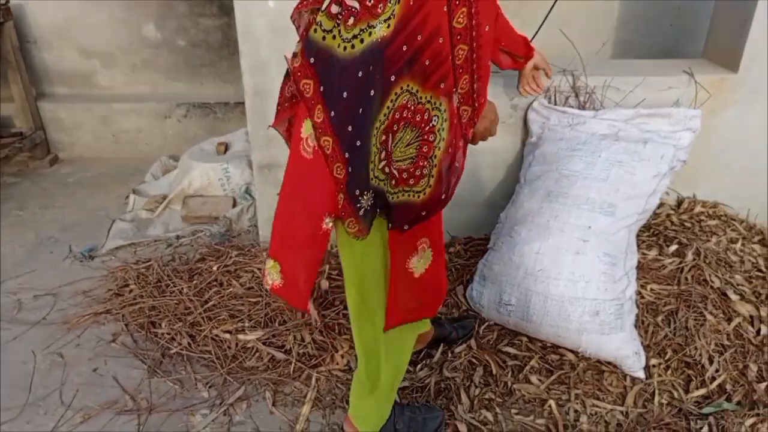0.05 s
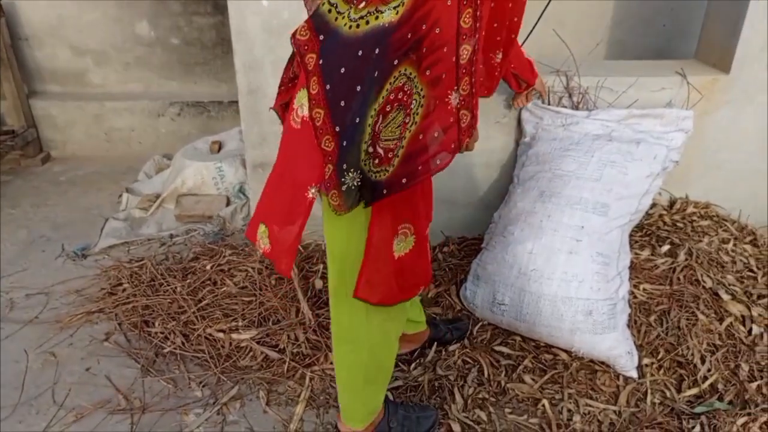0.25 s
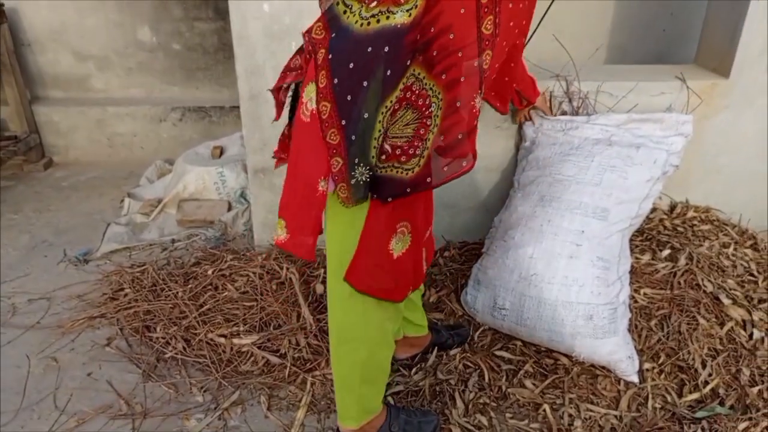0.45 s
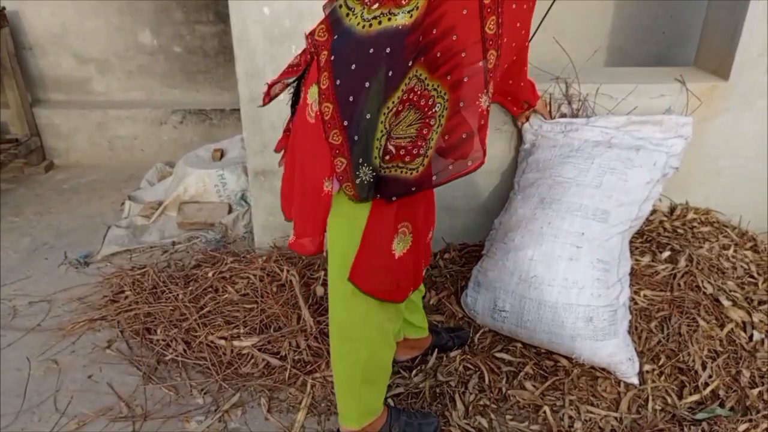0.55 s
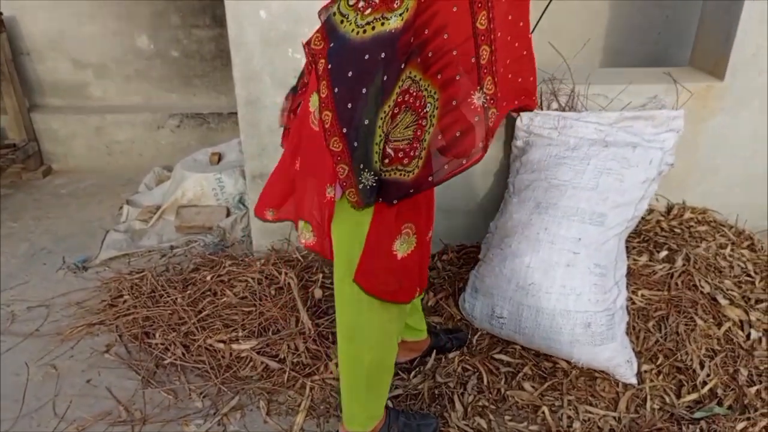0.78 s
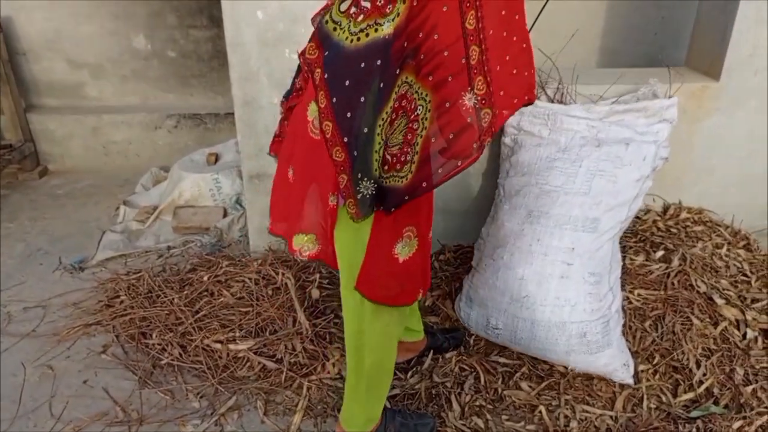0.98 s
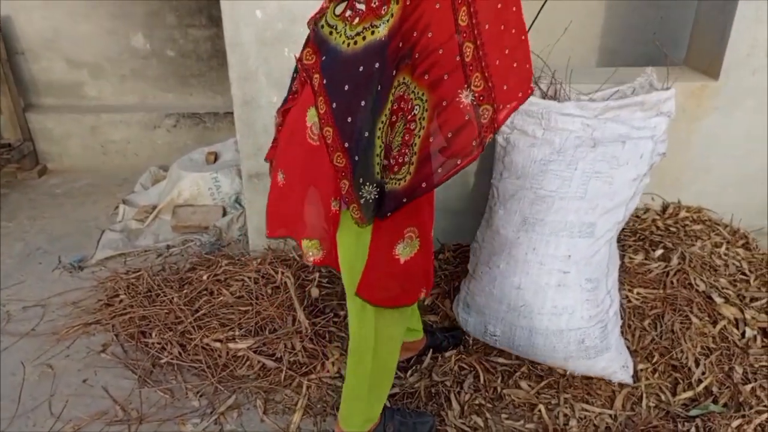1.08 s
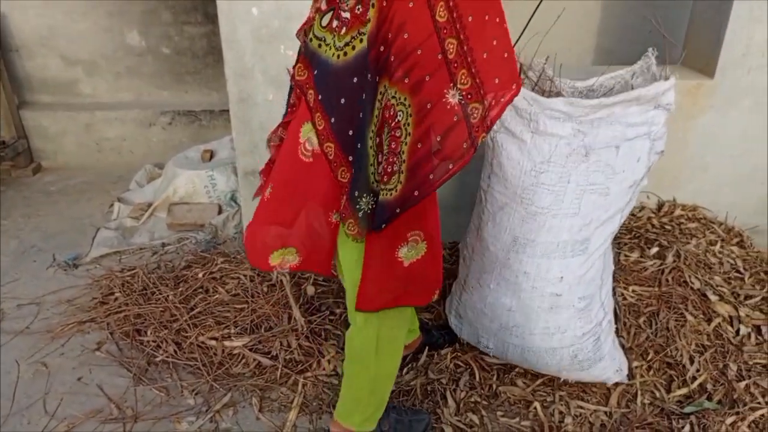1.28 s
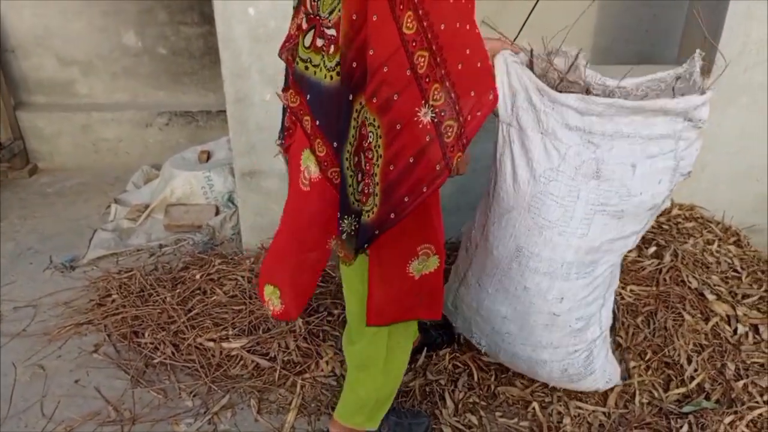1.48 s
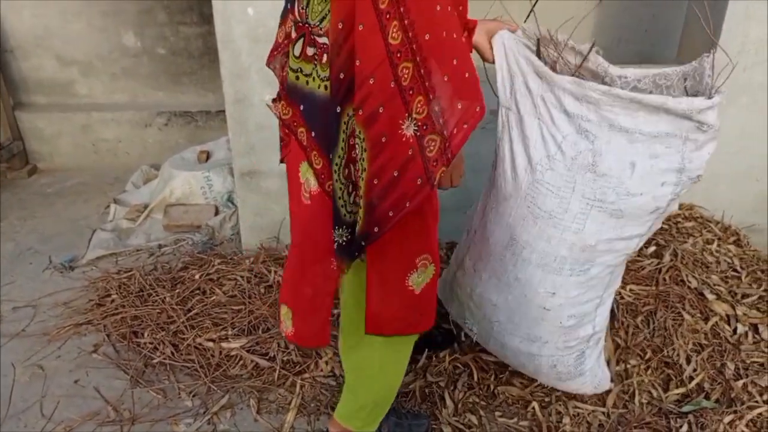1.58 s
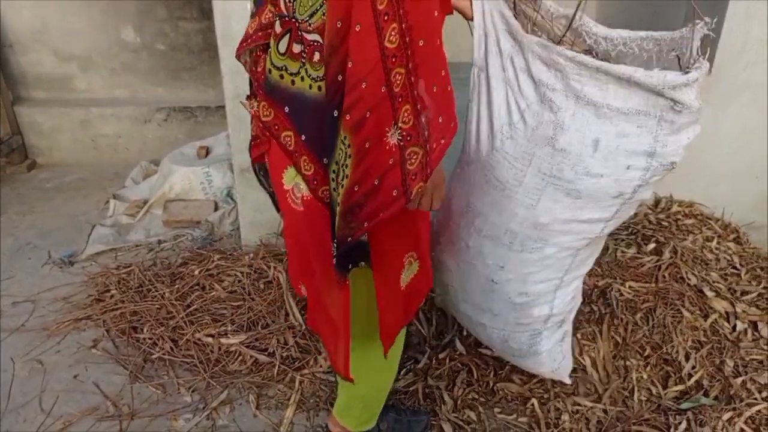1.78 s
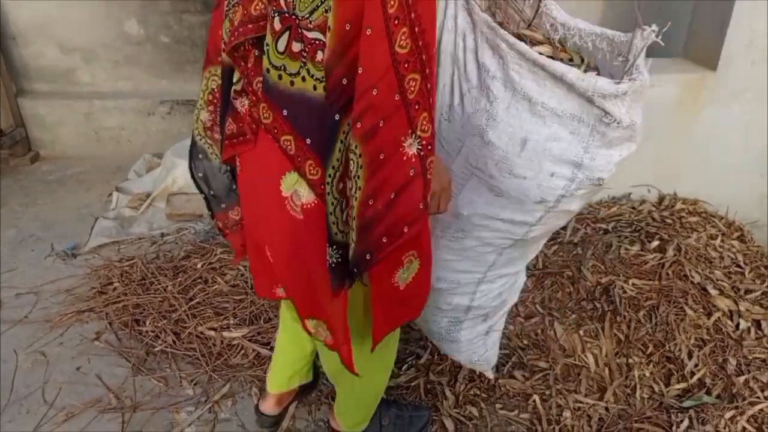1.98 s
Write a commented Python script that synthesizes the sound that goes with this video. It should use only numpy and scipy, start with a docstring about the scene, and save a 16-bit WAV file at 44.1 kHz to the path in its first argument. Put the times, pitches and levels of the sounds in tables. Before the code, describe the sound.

A sack full of dry stalks scrapes and rustles as it is pulled up in a quiet yard. Before it, twigs crackle and gusts thump on the microphone; afterwards come a sharp snap and two faint bird chirps.

```python
"""Dragging a sack of dry stalks

A woven plastic sack is gripped, dragged and lifted beside a wall, outdoors. Twigs crackle under a
shifting foot, the weave rasps, the load shuffles with a hollow rustle and a stalk snaps.
Puffs of air buffet the microphone in the first second; a small bird chirps twice among far-off tones."""
import sys
import numpy as np
from scipy import signal
from scipy.fft import rfft, irfft
from scipy.io import wavfile
from scipy.ndimage import uniform_filter1d

SR = 44100
rng = np.random.default_rng(int(sys.argv[2]) if len(sys.argv) > 2 else 0)


def master_out(mix):
    """Clip the mix to full scale and print it as 16-bit PCM to the path in sys.argv[1]."""
    frames = np.transpose(np.atleast_2d(mix))
    ceiling = np.clip(frames, -1, 1)
    pcm = np.round(ceiling * 32767).astype(np.int16)
    wavfile.write(sys.argv[1], SR, pcm)


N = 90404
T = np.arange(N) / SR
CATCH_RATE, SPURT_RATE = 200, 45  # fast and slow jumps in loudness, per second
SPURT_DB = 2.2  # typical size of a jump
# The tone of breaking wood: frequency_hz, level_db
TWIG_COLOUR = [(1190, -53), (1440, -18.5), (2700, 4), (4670, -4.5), (5660, -11), (6400, -10.5), (8190, -24),
               (11500, -12), (13400, -17.5), (15000, -10), (15800, -33.5)]


def amp(db):
    """Turn decibels into a gain."""
    return 10 ** (np.asarray(db) / 20)


def unit(x):
    """Scale a sound to an average (rms) level of 1."""
    return x / np.sqrt(np.mean(x ** 2) + 1e-20)


def steady(x, size=2200):
    """Even out the loudness but keep the fine grain."""
    power = uniform_filter1d(uniform_filter1d(x ** 2, size), size)
    return x / np.sqrt(power + 1e-12)


def curve(rows, column=1):
    """Join points of time and level into a smoothly changing gain."""
    rows = np.array(rows)
    return amp(np.interp(T, rows[:, 0], rows[:, column]))


def colour(x, points, size=8192):
    """Shape the bass and treble of a sound along points of frequency and level."""
    hz, db = np.array(points).T
    gain = amp(np.interp(np.log(np.fft.rfftfreq(size, 1 / SR) + 1), np.log(hz), db))
    # Build the filter so that it never sounds ahead of its input.
    cepstrum = irfft(np.log(gain))
    cepstrum[1:size // 2] *= 2
    cepstrum[size // 2 + 1:] = 0
    response = irfft(np.exp(rfft(cepstrum)))
    return signal.fftconvolve(x, response)[:len(x)]


def ring(x, hz, width_hz):
    """Let a sound ring at one pitch; a narrower width rings longer."""
    return signal.lfilter(*signal.iirpeak(hz, hz / width_hz, fs=SR), x)


def modes(x, table):
    """Bring out several pitches of a sound at once."""
    return sum(amp(db) * ring(x, hz, width_hz) for hz, width_hz, db in table)


def clicks(rate, spread_db):
    """Tiny random breaks and slips, about rate a second: many weak, a few strong."""
    happens = rng.random(N) < rate / SR
    size = np.minimum(rng.exponential(size=N), 5)
    sign = rng.choice([-1, 1], N)
    return happens * sign * amp(spread_db * size)


def catches(depth_db, rate):
    """A gain that jumps at random, rate times a second, as when things catch and let go."""
    hold = max(int(SR / rate), 2)
    steps = rng.standard_normal(N)[np.arange(N) // hold]
    return amp(depth_db * uniform_filter1d(steps, hold // 2))


def burst(start, decay_s):
    """A sudden spray of tiny slips that dies away."""
    return (T >= start) * np.exp(-np.abs(T - start) / decay_s) * rng.standard_normal(N)


def swell(start, length):
    """A rounded rise and fall."""
    return np.sqrt(np.abs(np.sin(np.pi * np.clip((T - start) / length, 0, 1))))


def rough_tones(table, arch, width_hz=85):
    """Rough, broken tones; the pitch rises and falls with each swell by the fraction arch."""
    out = 0
    for start, length, hz, db in table:
        tone = ring(ring(rng.standard_normal(N), hz, width_hz), hz, width_hz)
        tone = steady(tone) * catches(SPURT_DB, SPURT_RATE)
        strength = swell(start, length)
        bend = np.cumsum(hz * arch * (strength ** 2 - .5)) / SR
        bent_tone = np.real(signal.hilbert(tone) * np.exp(2j * np.pi * bend))
        out = out + amp(db) * strength * bent_tone
    return out


def yard():
    """Quiet outdoor hiss, a small bird's wavering chirps and faint far-off tones."""
    # The tone of the hiss: frequency_hz, level_db
    hiss_colour = [(400, -3), (900, -11), (2500, -4.5), (3200, -18), (3800, -4.5), (7500, -13),
                   (15000, -5.5)]
    # Bird chirps: start_s, length_s, first_hz, middle_hz, last_hz, level_db
    chirps = [(1.785, .055, 4750, 4080, 4300, -52.5), (1.962, .03, 4250, 4520, 4580, -52.5)]
    # Far-off tones: start_s, length_s, pitch_hz, level_db
    far_tones = [(0.64, 0.19, 660, -53), (0.682, .14, 938, -59), (1.05, 0.1, 332, -51.5),
                 (1.157, 0.13, 610, -53), (1.83, 0.18, 3730, -63), (1.82, .17, 1278, -66)]
    out = amp(-60.5) * unit(colour(rng.standard_normal(N), hiss_colour))
    for start, length, first, middle, last, db in chirps:
        glide = np.polyfit([0, .5, 1], [first, middle, last], 2)
        hz = np.polyval(glide, np.clip((T - start) / length, 0, 1))
        flutter = catches(depth_db=3.5, rate=220)
        cycles = np.cumsum(hz * flutter ** .04) / SR  # the flutter also shakes the pitch a little
        out += amp(db) * swell(start, length) * flutter * np.sin(2 * np.pi * cycles)
    return out + rough_tones(far_tones, arch=.05)


def air():
    """Swirls of air hit the microphone as dips in pressure over a rumble; stronger air flutters higher."""
    # Strength of the moving air: time_s, level_db
    flow_levels = [(0, -47.5), (.15, -54.5), (.21, -31), (.26, -42), (.33, -34.5), (.42, -21), (.47, -31),
                   (.56, -33), (.65, -18.5), (.76, -24.5), (.92, -29), (.98, -49), (1.1, -57),
                   (1.16, -39.5), (1.22, -44), (1.37, -28), (1.56, -36), (1.74, -65), (1.8, -28.5),
                   (1.9, -45), (1.97, -34.5), (2.05, -50)]
    # The tone of the low rumble: frequency_hz, level_db
    rumble_colour = [(42, -16), (60, -3.5), (85, -0.5), (125, -3), (190, -20.5), (320, -49)]
    # The tone of the higher flutter: frequency_hz, level_db
    flutter_colour = [(120, -16.5), (280, -3), (500, -15.5), (700, -44.5)]
    # Single puffs: time_s, level_db, pitch_hz
    puffs = [(0.205, -21.5, 90), (0.368, -16, 108), (.404, -11.5, 140), (0.411, -11, 255),
             (0.43, -11.5, 114), (0.588, -12, 138), (0.615, -12.5, 161), (0.6267, -11.5, 184),
             (0.636, -19.5, 150), (0.6509, -10.5, 151), (.660, -9, 142), (0.6746, -12.5, 146),
             (.688, -13, 163), (0.727, -13, 198), (0.764, -17.5, 110), (0.7949, -10.5, 139),
             (0.8817, -12, 157)]
    flow = curve(flow_levels)
    out = steady(colour(rng.standard_normal(N), rumble_colour), size=1300) * flow
    flutter = steady(colour(rng.standard_normal(N), flutter_colour), size=900)
    out += amp(36) * flutter * np.minimum(flow, .085) ** 3  # grows steeply, up to a limit
    for time, db, hz in puffs:
        cycles = (T - time) * hz
        shape = np.exp(1 - np.sqrt(1 + 2 * (cycles / .35) ** 2))  # fades within about one cycle
        out -= amp(db + 3) * np.cos(2 * np.pi * cycles) * shape
    return signal.sosfiltfilt(signal.butter(4, [43.3, 523], "band", fs=SR, output="sos"), out)


def wall(x, delay_s=.0142, decay_s=.011):
    """Add one echo off the wall and a short scattered tail."""
    echo = np.interp(T - delay_s, T, x, left=0)
    scatter = rng.standard_normal(N) * np.exp(-T / decay_s) * (T > delay_s)
    tail = signal.fftconvolve(x, scatter / np.linalg.norm(scatter))[:N]
    return x + amp(-12) * echo + amp(-20.5) * tail


def crackle(count=7):
    """Small twigs of different lengths break, each with a dry tick and its own short ring."""
    out = 0
    for hz in np.geomspace(2400, 4800, count):
        breaks = clicks(rate=1100 / count, spread_db=2.9)
        out = out + unit(breaks) + unit(ring(breaks, hz, width_hz=330)) / 2
    out = colour(out * catches(depth_db=4, rate=CATCH_RATE), TWIG_COLOUR)
    return steady(out) * catches(SPURT_DB, SPURT_RATE)


def twigs(snap_decay_s=.0013):
    """Twigs crackle and scratch underfoot; bigger ones snap with a brief ring and a spray of splinters."""
    # Crackle under the foot: time_s, level_db
    tread = [(0, -45.5), (.19, -41.5), (.32, -45), (.42, -64), (.48, -47), (.58, -49.5), (.66, -62),
             (.76, -58.5), (.9, -54), (1.0, -76)]
    # Stalks scratching over each other: start_s, decay_s, level_db
    scratches = [(0.368, .005, -22.5), (0.525, 0.006, -22.5), (0.7, 0.013, -30.5), (.899, 0.011, -29.5),
                 (0.947, 0.0087, -26.5)]
    # Twigs snapping: start_s, level_db, pitch_hz
    snaps = [(0.067, -25.5, 3500), (.097, -34, 3380), (0.106, -27, 2770), (0.176, -35, 3400),
             (.191, -29.5, 2740), (0.196, -36, 3700), (.235, -36, 3800), (0.2578, -32.5, 3450),
             (0.265, -32, 3050), (.302, -32, 3540), (.375, -26, 3260), (0.5218, -30, 3500),
             (0.5401, -25.5, 2730), (.700, -32, 3700), (1.506, -27.5, 2600), (1.6594, -24.5, 2150),
             (1.6613, -19.5, 4280)]
    out = crackle() * curve(tread)
    scratching = sum(amp(db) * burst(start, decay) for start, decay, db in scratches)
    out += colour(scratching, TWIG_COLOUR)
    t = T[:2048]
    fade = np.exp(-t / snap_decay_s)
    for start, db, hz in snaps:
        crack = amp(-14) * rng.standard_normal(len(t)) * fade  # splinters
        crack[0] += 1  # the break itself
        crack = colour(crack, TWIG_COLOUR)
        ringing = amp(1) * np.sin(2 * np.pi * hz * t) * fade
        snap = crack / np.abs(crack).max() + ringing
        i = int(start * SR)
        out[i:i + len(t)] += amp(db + 1) * snap / np.abs(snap).max()
    return signal.sosfilt(signal.butter(4, 1410, "high", fs=SR, output="sos"), out)


def crinkles(pitch_hz=11100, width_hz=5300):
    """Single plastic threads flick with a thin, high tick."""
    # Thread ticks: start_s, level_db
    ticks = [(.463, -33.5), (.477, -35), (1.871, -44), (1.932, -37), (1.998, -34)]
    flicks = sum(amp(db) * burst(start, decay_s=.0028) for start, db in ticks)
    return ring(ring(flicks, pitch_hz, width_hz), pitch_hz, width_hz)


def weave():
    """Plastic threads rasp over dry stalks, duller and more halting when slow; the sack creaks."""
    # Strength of the rubbing: time_s, level_db
    rub_levels = [(0, -48.5), (.6, -47.5), (.77, -52), (.885, -49), (.91, -46), (1.08, -39), (1.18, -36),
                  (1.26, -29.5), (1.34, -32.5), (1.44, -40.5), (1.58, -44), (1.72, -48), (1.8, -55.5),
                  (1.94, -74), (2.005, -42), (2.05, -42.5)]
    # The tone of the rubbing: frequency_hz, level_db
    rub_colour = [(700, -30.5), (1130, -24), (1420, -8.5), (1890, -6.5), (2380, 1.5), (4230, -8),
                  (6100, -10.5), (8120, -25), (10400, -14), (13500, -21), (15500, -12.5)]
    # Pitches at which the stalks ring: pitch_hz, width_hz, level_db
    stalk_modes = [(2250, 320, -8.5), (2400, 35, -19), (2770, 110, -2.5), (3540, 360, -4.5),
                   (4240, 170, -2.5)]
    # Creaks as the sack takes the weight: start_s, length_s, pitch_hz, level_db
    creaks = [(1.53, .03, 1850, -44), (1.715, .035, 1850, -52), (1.68, .42, 2370, -56)]
    slips = clicks(rate=9000, spread_db=1.5) * catches(depth_db=1.3, rate=CATCH_RATE)
    slips = colour(slips, rub_colour)
    ringing = modes(slips, stalk_modes)
    fast_rub = steady(slips + ringing)
    slow_rub = steady(slips / 2 + 2 * ringing)
    slow_rub = signal.sosfiltfilt(signal.butter(3, 3030, fs=SR, output="sos"), slow_rub)
    effort = curve(rub_levels)
    brightness = np.minimum(effort / amp(-45), 1)  # fully bright from -45 dB up
    halting = catches(SPURT_DB, SPURT_RATE) ** (2 * (1 - brightness))
    rub = slow_rub + brightness * (fast_rub - slow_rub)
    return rub * effort * halting + rough_tones(creaks, arch=0)


def load():
    """Stalks shift inside the sack with a hollow rustle, while its bottom scrapes along in jerks."""
    # Loudness of the moving load: time_s, rustle_db, scrape_db
    load_levels = [(1.16, -91, -102), (1.235, -32.5, -46.5), (1.275, -22, -33.5), (1.37, -26.5, -34),
                   (1.5, -34.5, -42), (1.58, -28.5, -45), (1.69, -36, -47), (1.765, -43.5, -75),
                   (1.88, -72, -89.5)]
    # Hollow-sounding pitches in the rustle beside the wall: pitch_hz, width_hz, level_db
    rustle_pitches = [(200.6, 17, -6.5), (261.5, 11.9, 4.5), (341, 21.5, -1), (367.3, 8.3, -2),
                      (438, 19.5, -5.5), (488, 5.5, -13)]
    # The tone of the dull shuffle: frequency_hz, level_db
    shuffle_colour = [(45, -46), (90, 0), (260, 6), (420, -5), (620, -39)]
    # The tone of the scrape: frequency_hz, level_db
    scrape_colour = [(300, -32.5), (600, 2), (1800, -2), (3000, -13), (6000, -53)]
    # Hollow-sounding pitches in the scrape beside the wall: pitch_hz, width_hz, level_db
    scrape_pitches = [(610.6, 7.8, 11), (821.5, 11, 7.5), (930, 26, -1.5)]
    slips = lambda: clicks(rate=2500, spread_db=2)  # new random slips on each call
    hollow = modes(slips(), rustle_pitches)
    hollow = signal.sosfilt(signal.butter(5, [80, 520], "band", fs=SR, output="sos"), hollow)
    shuffle = colour(slips(), shuffle_colour)
    rustle = steady(amp(-1) * unit(hollow) + amp(-4.5) * unit(shuffle))
    scrape = colour(slips(), scrape_colour)
    scrape = steady(scrape + modes(scrape, scrape_pitches)) * catches(SPURT_DB, CATCH_RATE)
    return rustle * curve(load_levels) + scrape * curve(load_levels, column=2)


def scene():
    """Twigs, sack and yard echo off the wall; the air on the microphone has no echo."""
    sources = twigs() + weave() + crinkles() + load() + yard()
    return (wall(sources) + air())[None]


def record(dry):
    """Cut the treble above 15700 Hz."""
    return signal.sosfilt(signal.ellip(10, .2, 80, 15700, fs=SR, output="sos"), dry)


dry = scene()
out = record(dry)
master_out(out)
```